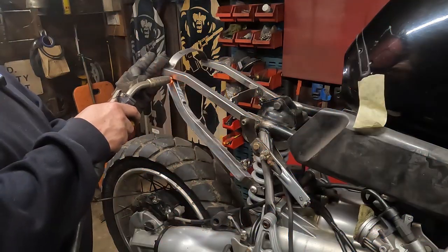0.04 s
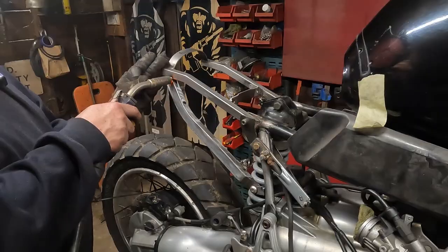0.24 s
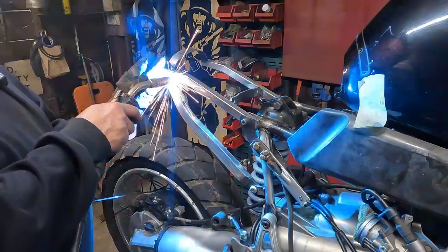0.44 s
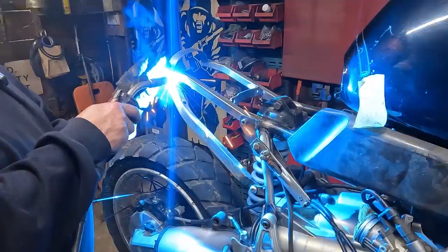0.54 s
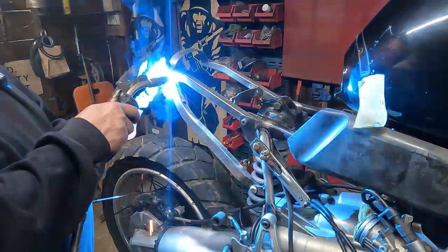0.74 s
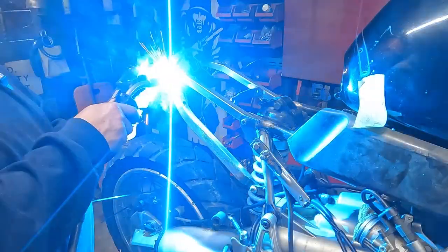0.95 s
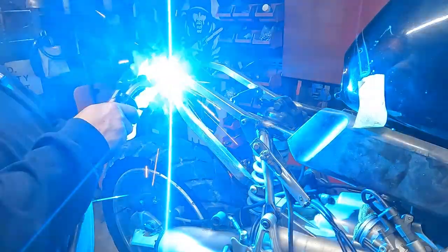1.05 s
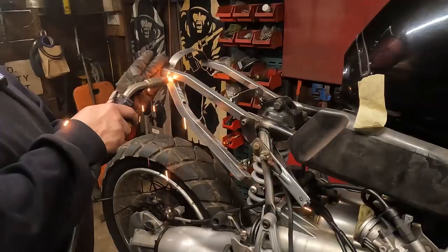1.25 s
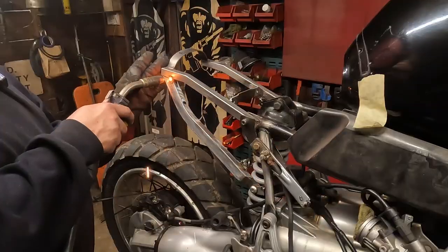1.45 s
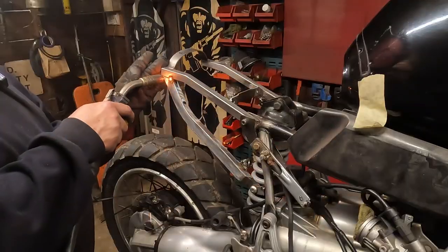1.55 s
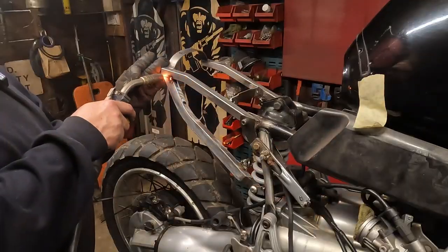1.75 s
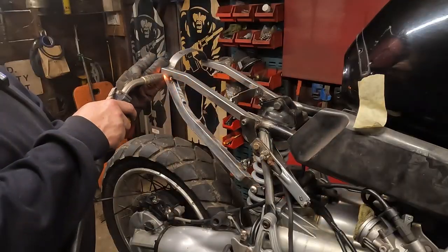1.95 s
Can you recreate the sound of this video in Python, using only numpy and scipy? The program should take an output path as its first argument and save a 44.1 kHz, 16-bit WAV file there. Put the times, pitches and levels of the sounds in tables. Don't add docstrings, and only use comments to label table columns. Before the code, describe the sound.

Electric arc welding: a loud snap, a brief hiss, then sputtering pops, with fan drone around it

```python
import sys
import numpy as np
from scipy import signal
from scipy.fft import rfft, irfft, next_fast_len
from scipy.io import wavfile
from scipy.ndimage import uniform_filter1d, map_coordinates

SR = 44100
rng = np.random.default_rng(int(sys.argv[2]) if len(sys.argv) > 2 else 0)


def gain_from_decibels(decibels):
    exponent = np.asarray(decibels, float) / 20
    return 10 ** exponent


def to_wav(s):
    ch = np.atleast_2d(s).T
    pcm = np.round(np.clip(ch, -1, 1) * 32767)
    wavfile.write(sys.argv[1], SR, pcm.astype(np.int16))


N = 88200

# [t/s, level/dB]
FAN_LEVEL = [
    (0, -29.5),
    (.12, -28.5),
    (.45, -24),
    (.53, -23),
    (.82, -27),
    (.9, -32.5),
    (1.35, -40),
    (2.0, -29),
]
# [f/Hz, density/dB]
DRONE_SPECTRUM = [(30, -42), (60, -15.5), (85, -11), (200, -8.5), (330, -5.5), (750, -7.5), (2400, -21),
                  (15500, -66)]
# [f/Hz, width/Hz, level over drone/dB]
CASE_MODES = [(84, 23, 2.5), (118, 16, -4.5), (273.6, 28.5, 4), (357.5, 13, 4), (420, 5.5, -1),
              (641, 18.5, 1.5), (743, 52, -4), (1134, 11.7, 4.5), (2310, 25, 1)]
# [f/Hz, density/dB]
FAN_HISS_SPECTRUM = [(1500, -40), (3000, 3.5), (6000, -2.5), (8000, -8.5), (15500, -23.5)]
# [f/Hz, density/dB]
STOP_SPECTRUM = [(300, -13), (1000, 6), (3500, -1), (6000, -4), (12000, -28)]
# [t/s, level/dB, f/Hz, t60/s]
PUFFS = [
    (.536, -15.5, 121.3, 0.14),
    (0.561, -7, 225, 0.042),
    (0.549, -26, 1103, 0.28),
    (0.591, -15, 185, 0.11),
    (0.648, -20.5, 267, 0.083),
    (1.249, -33, 190, 0.19),
    (1.26, -32.5, 306, 0.11),
]
# [t/s, hiss level/dB, top over hiss/dB, tube tone level/dB]
ARC_COURSE = [
    (.529, -61, -9, -90),
    (.535, -14.5, -16, -24),
    (.6, -17, -22, -23.5),
    (.77, -22, -4, -31.5),
    (.78, -18, -3, -35),
    (.83, -16.5, 3, -59),
    (.86, -22, 2, -50),
    (.875, -29, -13, -54),
    (1.19, -31.5, -1.5, -68),
    (1.33, -69.5, -15, -90),
]
# [f/Hz, density/dB]
HISS_SPECTRUM = [(300, -22), (1200, -15), (2600, -21), (4600, -12.5), (5400, -4.5), (7500, -5),
                 (11000, -14), (15500, -25)]
TOP_SPECTRUM = [(7000, -27.5), (9500, -3.5), (12400, -4), (15500, -0.5)]
# [f/Hz, width/Hz, level/dB]
WORK_MODES = [(5620, 200, -4), (6540, 200, -5), (7060, 60, -2), (7870, 80, -4), (8200, 100, -5),
              (9950, 150, -3), (12350, 250, -2), (14100, 100, -5)]
# [f/Hz, width/Hz, level/dB]
TUBE_MODES = [(1666, 256, -3), (1823, 214, -1)]
# [t/s, crack level/dB, thump level/dB, spatter level/dB]
POPS = [(.4505, -31, -55, -44), (0.5362, 2, -15, -14), (0.5378, -7.5, -28, -14), (0.5446, 5.5, -16, -18),
        (0.5505, -11, -29, -22.5), (0.7754, -7, -37, -13.5), (0.817, -11, -41, -19),
        (0.8638, 10, -5.5, 0.5), (0.9126, 8, -3.5, -4), (0.9364, -1, -10.5, -8.5),
        (0.9849, 2.5, -12.5, -3.5), (1.0144, -5.5, -12.5, -16), (1.046, 1.5, -13, -6.5),
        (1.0644, -22, -23, -16), (1.0869, 1, -19.5, -9.5), (1.113, -4.5, -16, -16), (1.135, -5, -19.5, -16),
        (1.1646, -7, -15.5, -15.5), (1.183, -17.5, -44, -28), (1.1872, -14, -23, -22)]
# [f/Hz, width/Hz, level/dB]
CRACK_MODES = [(800, 650, -11), (1770, 410, -5), (2723, 266, -8), (5390, 750, 0.5), (7680, 480, -4.5),
               (8340, 1500, -8), (11700, 2560, -6.5), (14100, 5100, -8)]
SPATTER_MODES = [(3500, 3600, -6.5), (5670, 360, 4.5), (7500, 2900, 0), (10100, 4000, -7)]
# [f/Hz, t60/s]
ROOM_DECAY = [(150, 1), (1000, 0.33), (5000, 0.29), (14000, 0.22)]
# [f/Hz, level/dB]
ROOM_COLOUR = [(100, -9), (400, -5.5), (2000, 2.5), (5600, -2.5), (14000, -0.5)]
# [start t/s, end t/s]
SIDE_SPANS = [(.37, 0.38), (0.859, .98), (1.032, 1.09), (1.3, 1.4), (1.65, 1.66)]


def unit(x):
    return x / np.sqrt(np.mean(x ** 2) + 1e-20)


def along(points, hz):
    f, v = np.transpose(points)
    return np.interp(np.log(hz + 1), np.log(f + 1), v)


def curves(rows):
    s, *cols = np.transpose(rows)
    return [np.interp(np.arange(N) / SR, s, c) for c in cols]


def wobble(rate):
    knots = rng.standard_normal(int(N * 400 / SR) + 4)
    return map_coordinates(knots, [np.arange(N) * min(rate, 400) / SR])


def filtered(x, response):
    m = next_fast_len(N + SR // 2)
    return irfft(rfft(x, m) * response(np.fft.rfftfreq(m, 1 / SR)), m)[..., :N]


def peaks(modes, f):
    total = 0
    for k, (centre, width, db) in enumerate(modes):
        total = total + (-1) ** k * gain_from_decibels(db) * 1j * f * width / (centre ** 2 - f ** 2 + 1j * f * width)
    return total


def rush(gain, patchy_db):
    z = signal.stft(rng.standard_normal(N + 512), nperseg=512)[2]
    field = uniform_filter1d(rng.standard_normal(z.shape), size=6, axis=0)
    field = uniform_filter1d(field, size=8, axis=1)
    noise = signal.istft(z * gain_from_decibels(patchy_db * unit(field)), nperseg=512)[1][:N]
    return unit(filtered(noise, gain))


def lifted(spectrum, modes, lift_db):
    def gain(f):
        mode_power = sum(np.abs(peaks([mode], f)) ** 2 for mode in modes)
        return gain_from_decibels(along(spectrum, f)) * np.sqrt(1 + gain_from_decibels(2 * lift_db) * mode_power) * (f > 20)
    return gain


def fan():
    level_db, = curves(FAN_LEVEL)
    top_db = level_db.max()
    flutter = gain_from_decibels(level_db + 0.5 + 1.26 * wobble(25.34))
    drone = flutter * rush(lifted(DRONE_SPECTRUM, CASE_MODES, 6.9), patchy_db=0.8)
    hiss_level = gain_from_decibels(top_db - 15 + 1.14 * (level_db - top_db))
    hiss = hiss_level * rush(lambda f: gain_from_decibels(along(FAN_HISS_SPECTRUM, f)), patchy_db=0.5)
    return drone + hiss


def feed_stop():
    start_s, level_db, t60_s, rise_s = 1.244, -32, 0.25, 0.004
    t = np.clip(np.arange(N) / SR - start_s, 0, 2)
    envelope = gain_from_decibels(level_db - 60 * t / t60_s + 2.2 * wobble(84)) * (1 - np.exp(-t / rise_s))
    return envelope * rush(lambda f: gain_from_decibels(along(STOP_SPECTRUM, f)) * (f > 150), patchy_db=-1.5)


def puffs():
    out, t = np.zeros(N + SR), np.arange(SR // 3) / SR
    rise = 1 - np.exp(-t / 0.0059)
    for s, db, hz, t60 in PUFFS:
        wander = np.cumsum(rng.standard_normal(len(t))) * 0.036
        tone = np.sin(2 * np.pi * hz * t + wander)
        out[round(s * SR):][:len(t)] += gain_from_decibels(db - 60 * t / t60 + 9) * rise * tone
    return out[:N]


def arc():
    hiss_db, top_db, tube_db = curves(ARC_COURSE)
    grit = gain_from_decibels(1.8 * wobble(90.3) + 2.2 * wobble(350))
    hiss = rush(lifted(HISS_SPECTRUM, WORK_MODES, 7), patchy_db=0.0)
    top = gain_from_decibels(top_db) * rush(lifted(TOP_SPECTRUM, WORK_MODES, 9), patchy_db=3.0)
    tube_level = gain_from_decibels(tube_db + 1.5 * wobble(40))
    tube = tube_level * rush(lambda f: peaks(TUBE_MODES, f), patchy_db=1.7)
    return gain_from_decibels(hiss_db) * grit * (hiss + top) + tube


def pops():
    snap, fizz, crack_t60_s = 5.5, 1.1, 0.007
    echo_s, echo_db = 0.0038, -9
    spatter_delay_s, spatter_rise_s, spatter_t60_s = 0.0012, 0.002, 0.034
    thump_turns, thump_slows_s, thump_peak_s = 0.81, 0.0006, 0.0024
    cracks, spray, thumps = np.zeros((3, N + SR))
    t = np.arange(SR // 20) / SR
    swing = np.sin(2 * np.pi * thump_turns * np.log(1 + t / thump_slows_s))
    thump = -t / thump_peak_s * np.exp(1 - t / thump_peak_s) * swing
    late = np.clip(t - spatter_delay_s, 0, 1)
    spatter_rise = 1 - np.exp(-late / spatter_rise_s)
    noises = rng.standard_normal((len(POPS), 2, len(t)))
    for (s, crack_db, thump_db, spatter_db), noise in zip(POPS, noises):
        i = round(s * SR)
        crack = gain_from_decibels(crack_db - 60 * t / crack_t60_s) * (fizz * noise[0] - snap * (t == 0))
        cracks[i:][:len(t)] += crack
        spray[i + round(echo_s * SR)] += gain_from_decibels(spatter_db + 10.5 + echo_db) * snap
        spray[i:][:len(t)] += gain_from_decibels(spatter_db - 60 * late / spatter_t60_s) * spatter_rise * noise[1]
        thumps[i:][:len(t)] += gain_from_decibels(thump_db) * thump
    cracks = gain_from_decibels(5) * filtered(cracks[:N], lambda f: 0.083 + peaks(CRACK_MODES, f))
    spray = gain_from_decibels(6.5) * filtered(spray[:N], lambda f: peaks(SPATTER_MODES, f))
    return cracks + spray + thumps[:N]


def room(x):
    hz, t, z = signal.stft(rng.standard_normal(SR // 2), SR, nperseg=256)
    decay = gain_from_decibels(-60 * t / along(ROOM_DECAY, hz)[:, None])
    tail = signal.istft(z * decay, SR, nperseg=256)[1]
    delayed = np.pad(x, (350, 0))
    wet = signal.fftconvolve(delayed, tail / np.linalg.norm(tail))[:N]
    return filtered(wet, lambda f: gain_from_decibels(along(ROOM_COLOUR, f)))


def scene():
    weld = arc() + pops() + puffs() + feed_stop()
    return np.tile(weld + gain_from_decibels(-7) * room(weld) + fan(), (2, 1))


def band_limit(x):
    return signal.sosfilt(signal.butter(12, 16230, fs=SR, output="sos"), x)


def record(dry):
    low_cut_hz, clip_top, clip_hard, side_db = 20, 1.02, 12, -28
    x = filtered(dry, lambda f: (1j * f / (low_cut_hz + 1j * f)) * np.clip((15950 - f) / 300, 0, 1))
    x = x / (1 + np.abs(x / clip_top) ** clip_hard) ** (1 / clip_hard)
    t = np.arange(N) / SR
    differs = sum((t > a) & (t < b) for a, b in SIDE_SPANS)
    steps = np.repeat(rng.standard_normal(N // 40 + 1), 40)[:N]
    side = gain_from_decibels(side_db) * x[0] * differs * steps
    return band_limit(x + side * np.array([[1], [-1]]))


dry = scene()
out = record(dry)
to_wav(out)
```